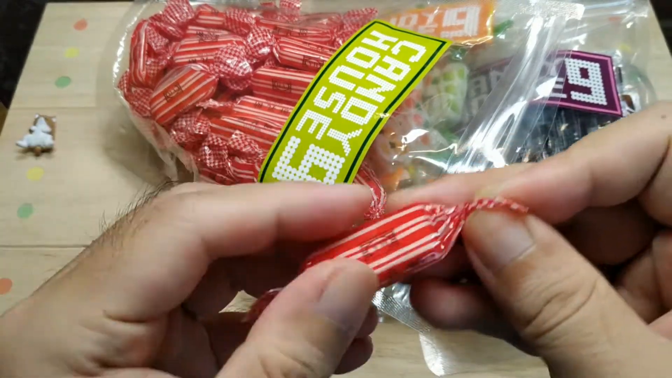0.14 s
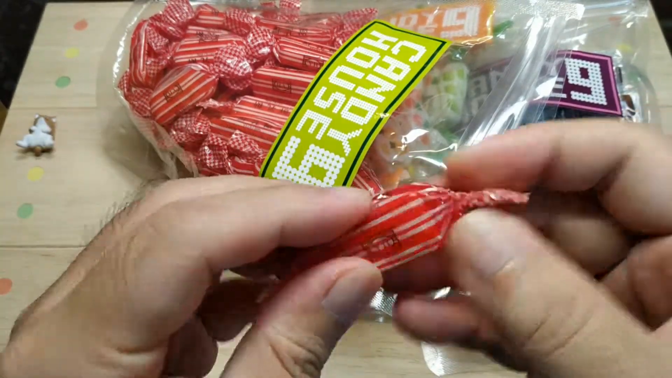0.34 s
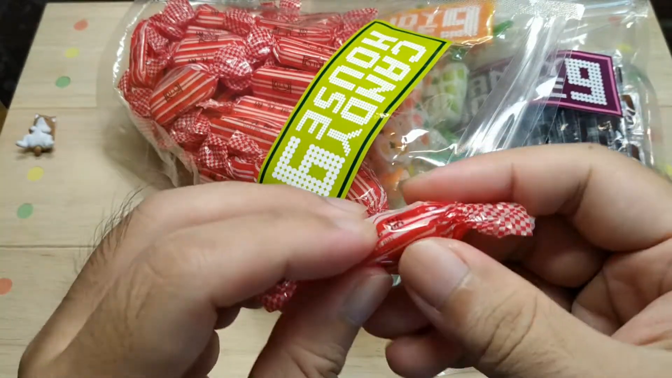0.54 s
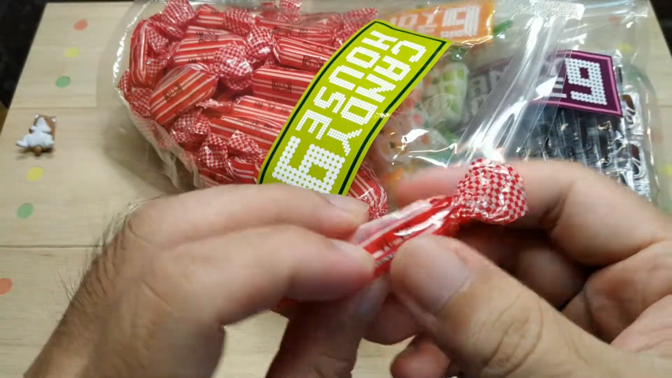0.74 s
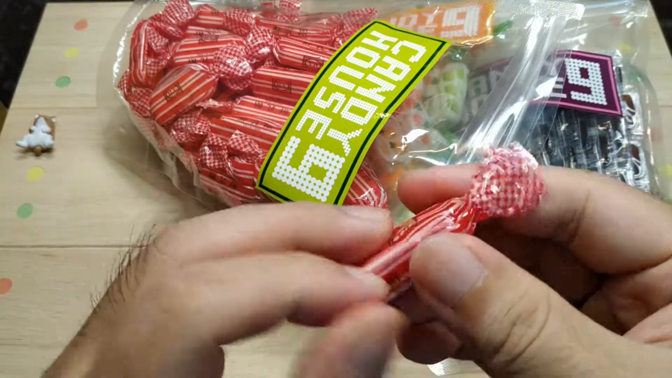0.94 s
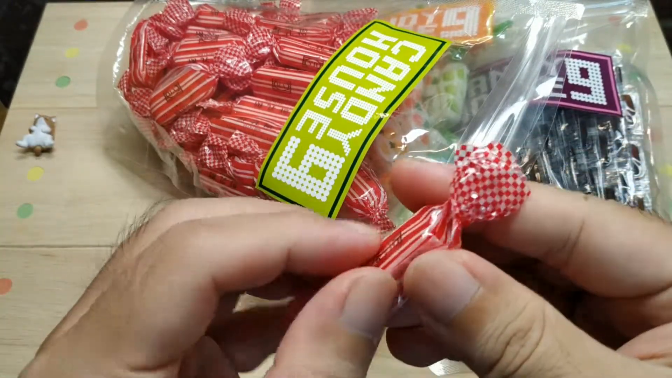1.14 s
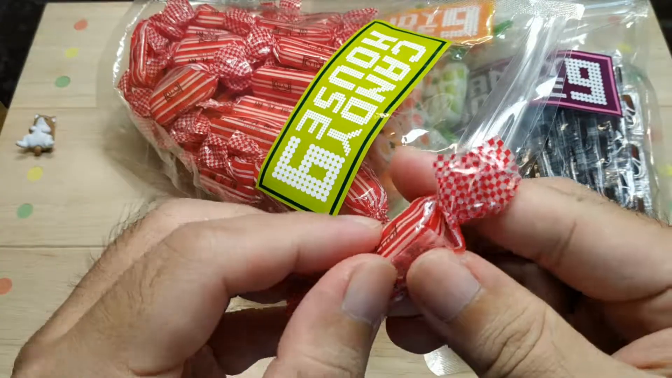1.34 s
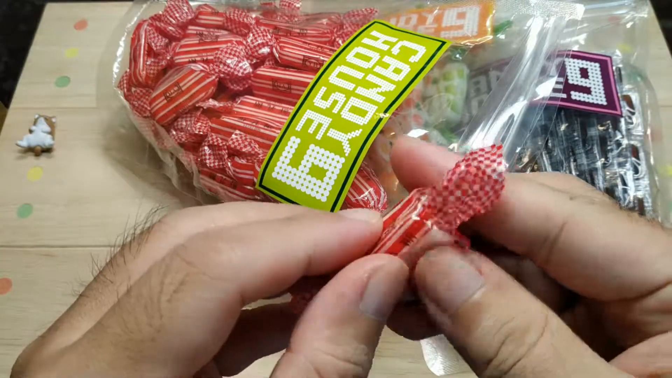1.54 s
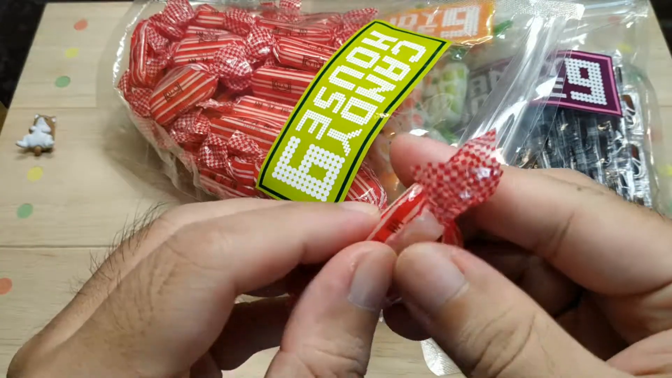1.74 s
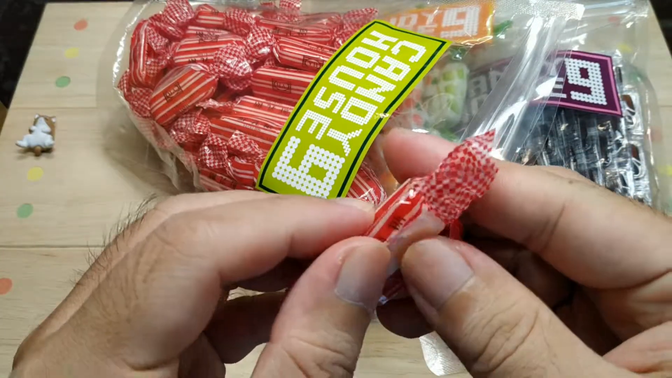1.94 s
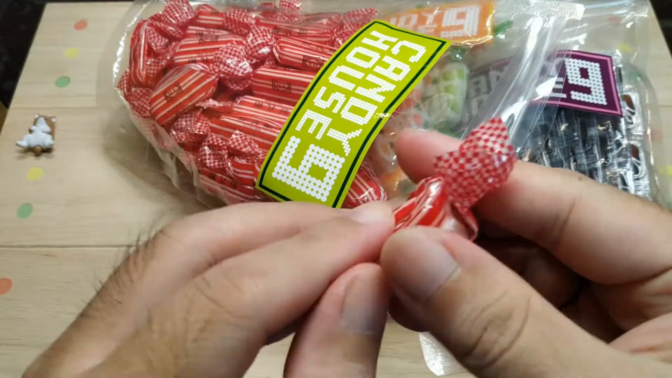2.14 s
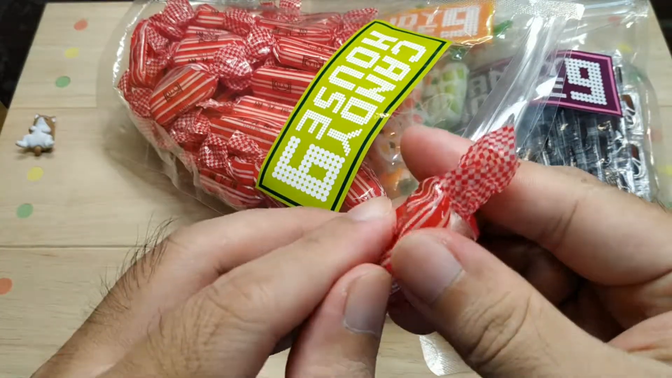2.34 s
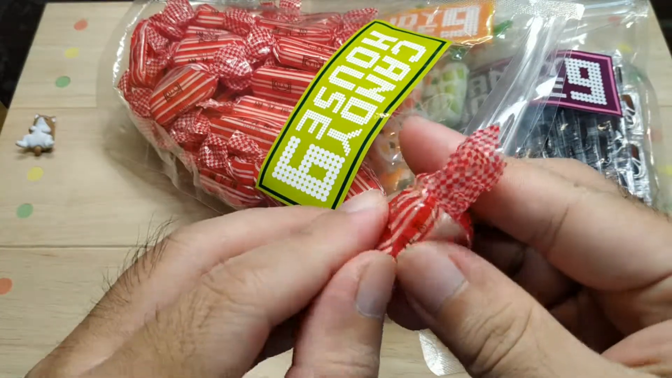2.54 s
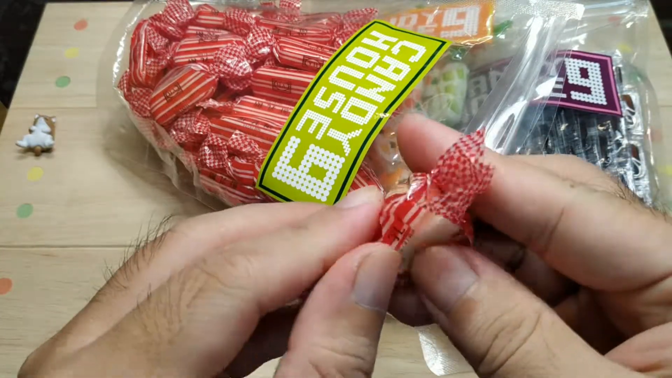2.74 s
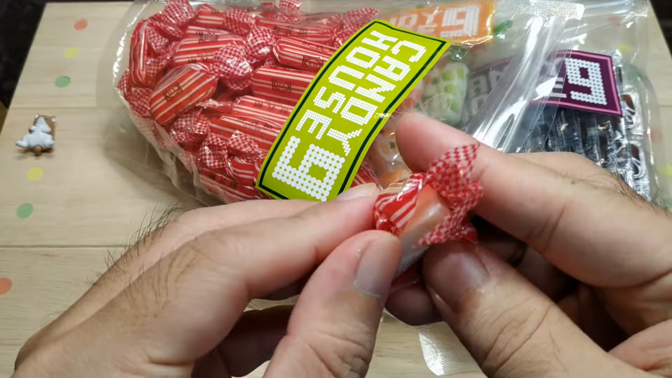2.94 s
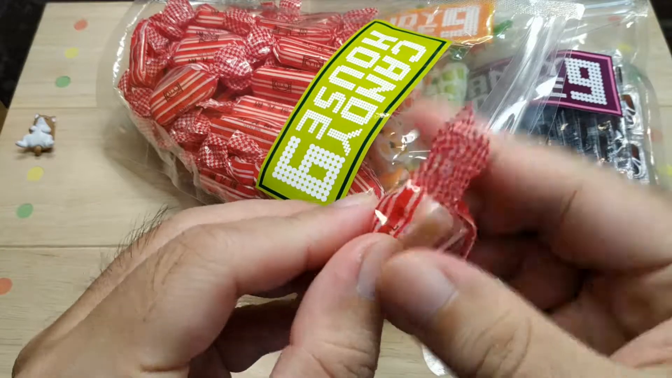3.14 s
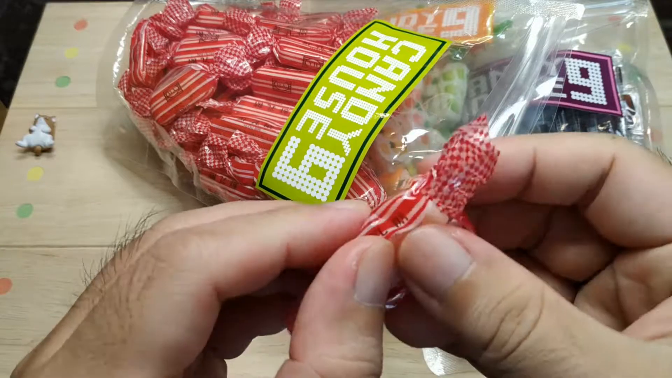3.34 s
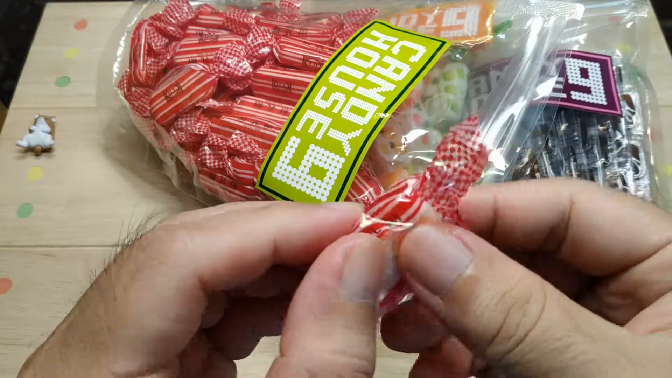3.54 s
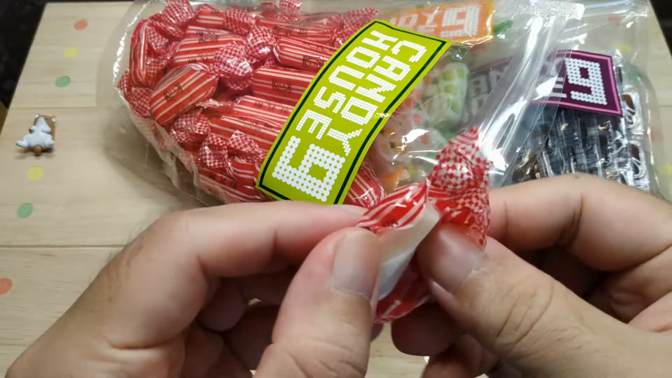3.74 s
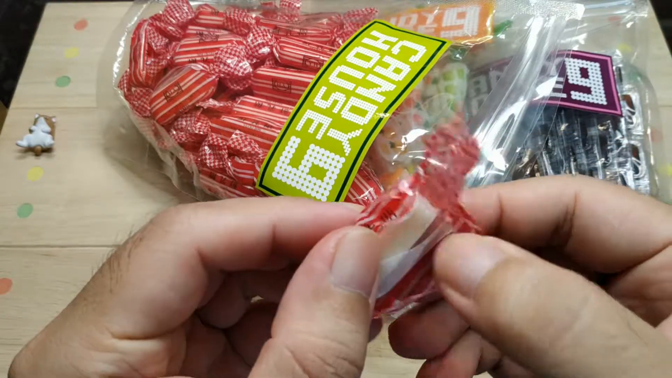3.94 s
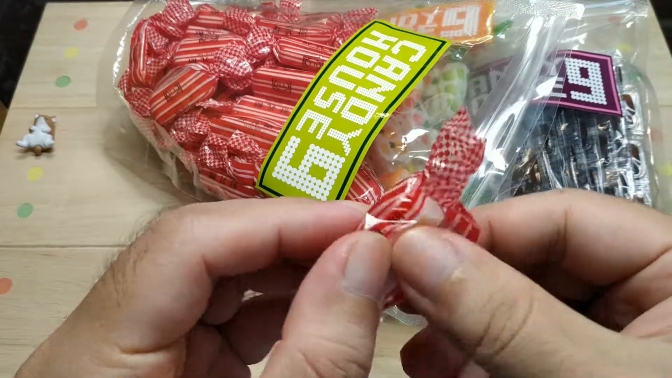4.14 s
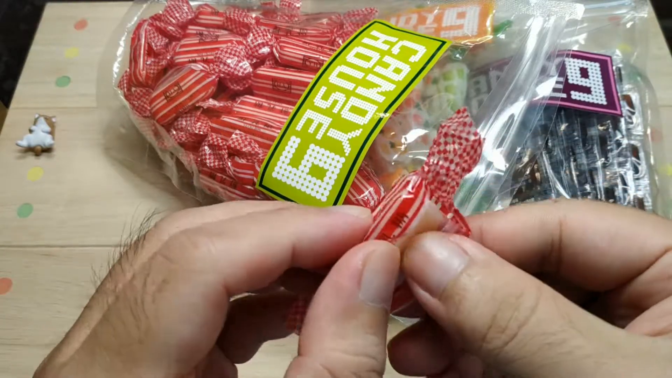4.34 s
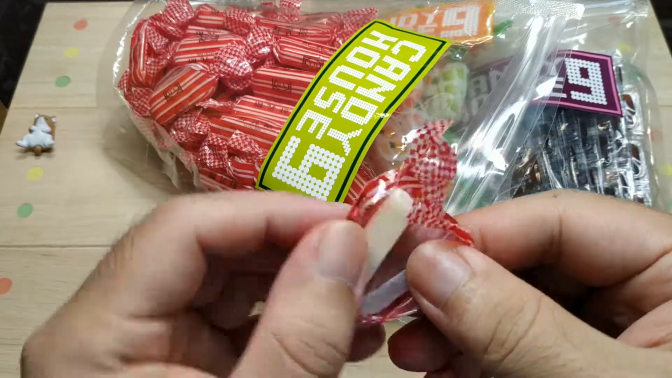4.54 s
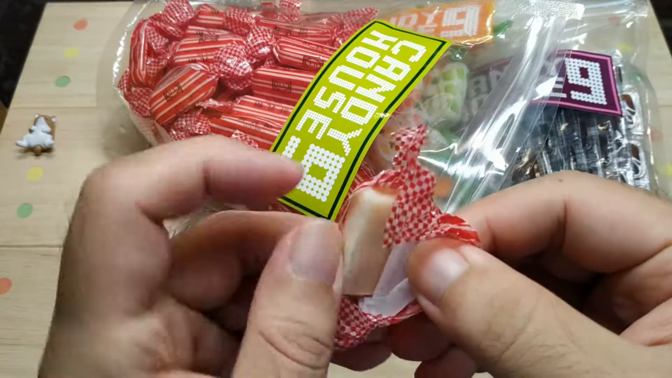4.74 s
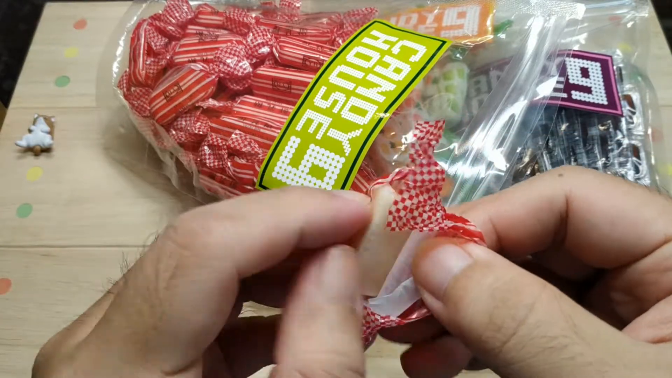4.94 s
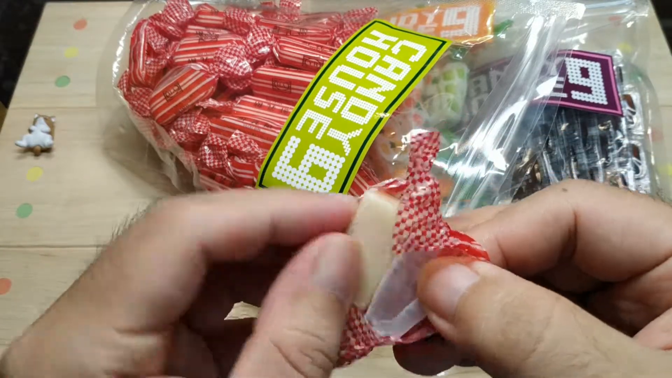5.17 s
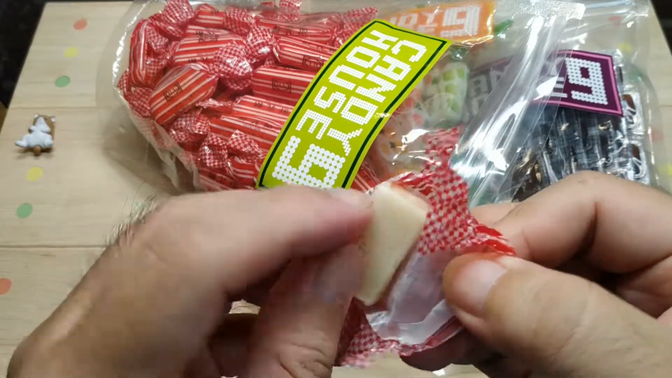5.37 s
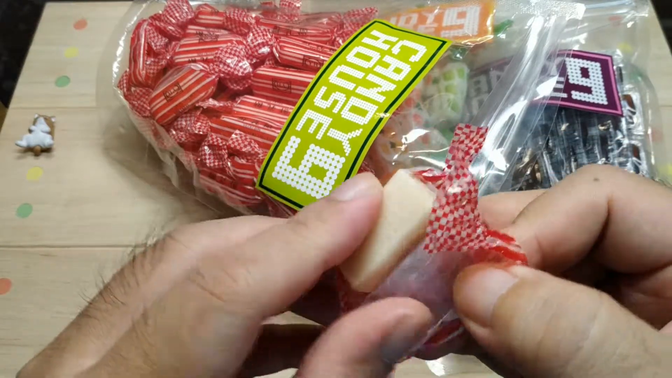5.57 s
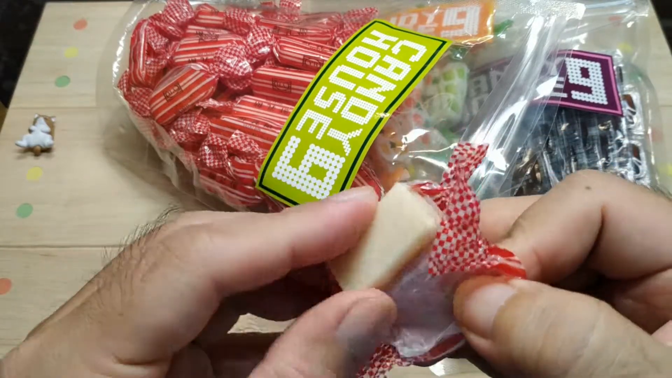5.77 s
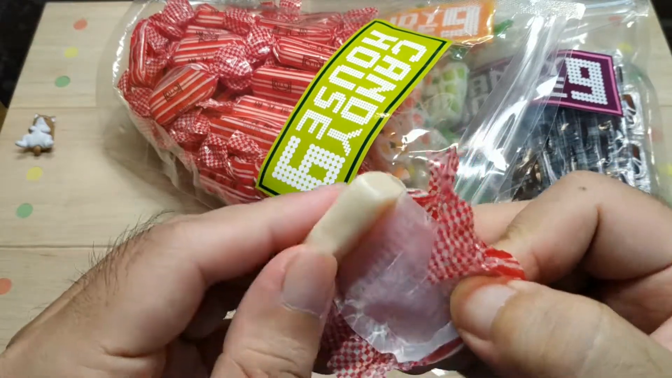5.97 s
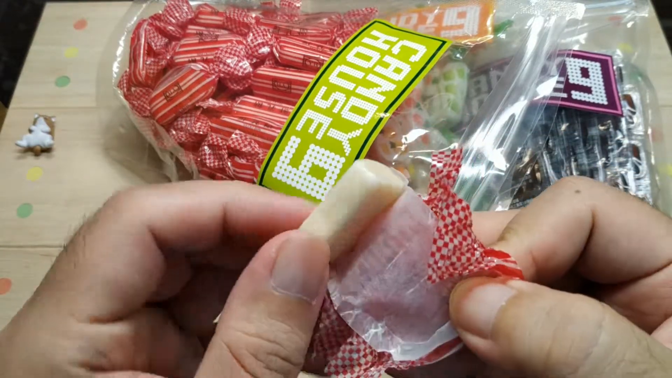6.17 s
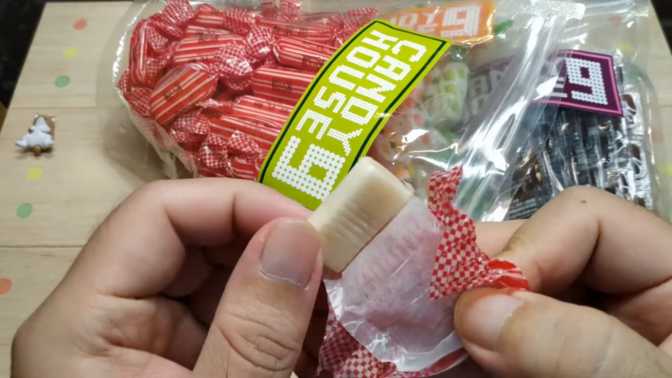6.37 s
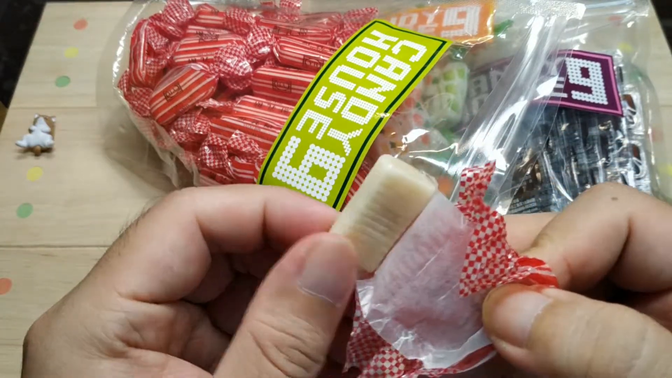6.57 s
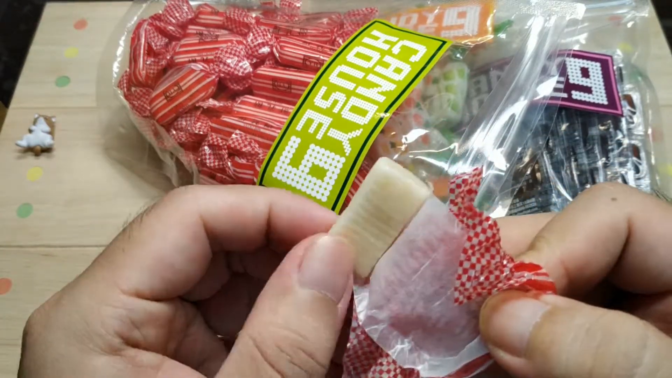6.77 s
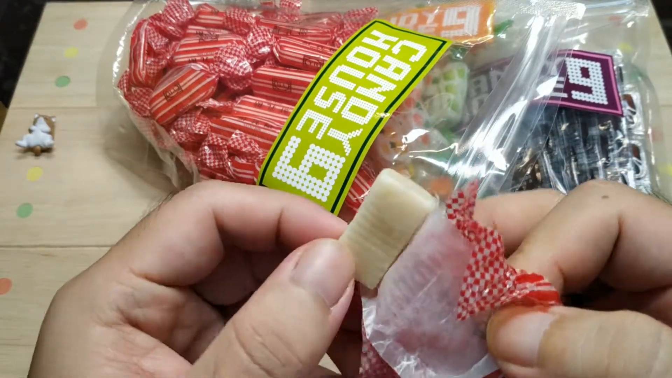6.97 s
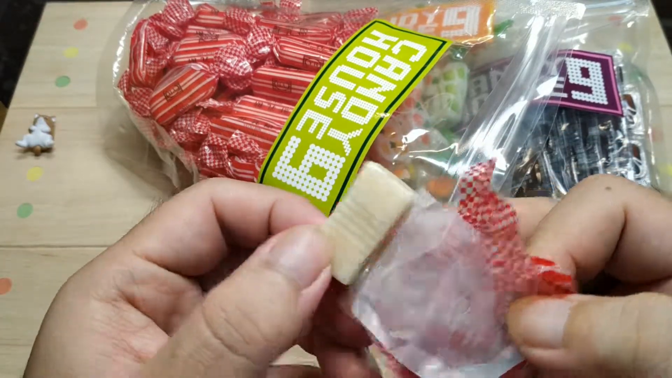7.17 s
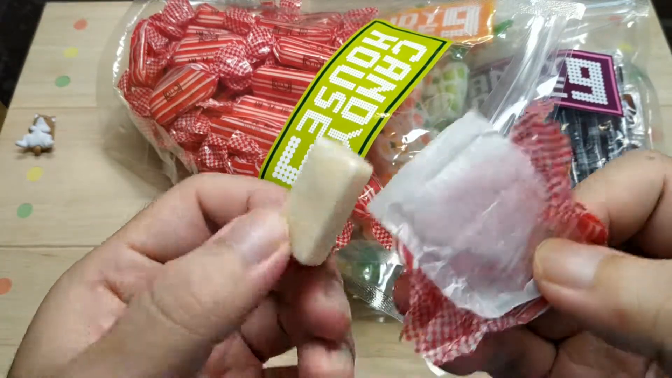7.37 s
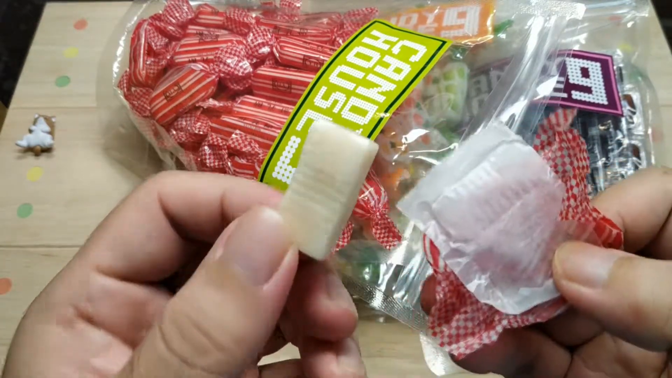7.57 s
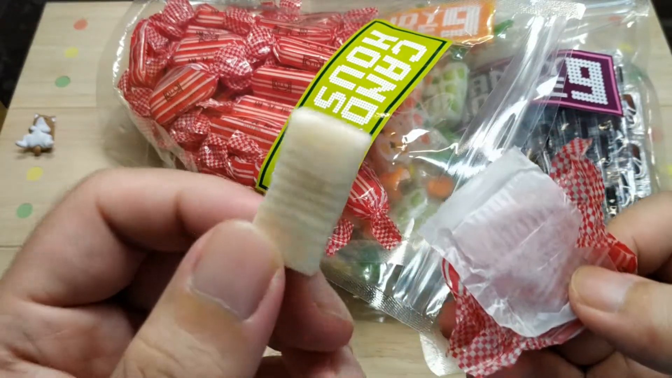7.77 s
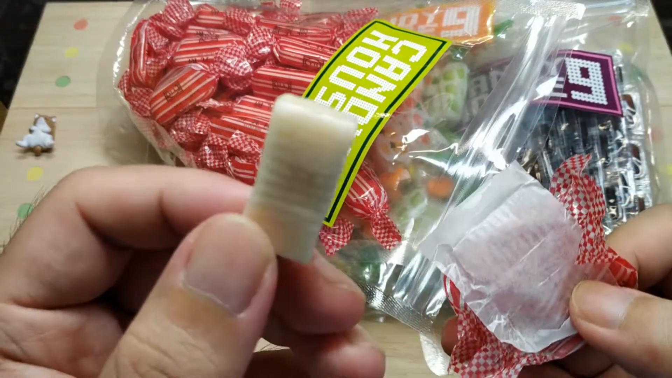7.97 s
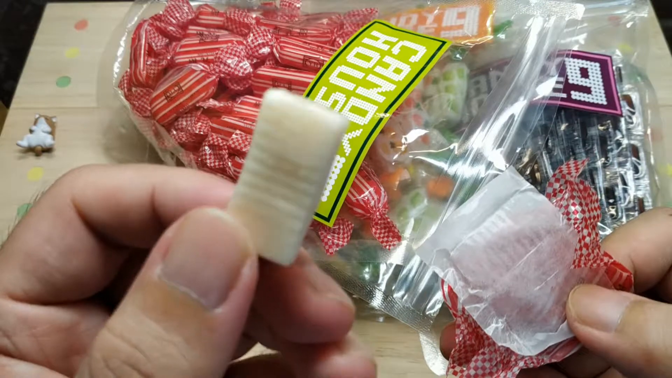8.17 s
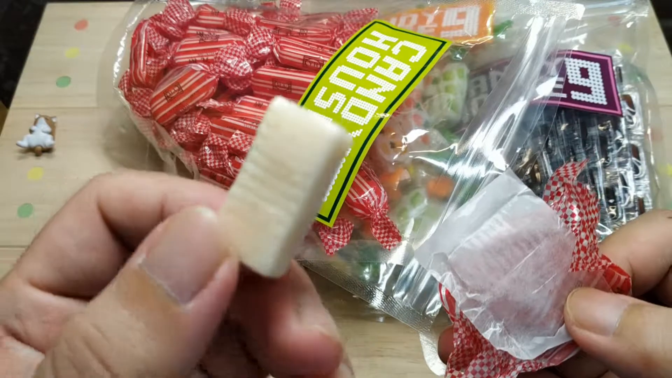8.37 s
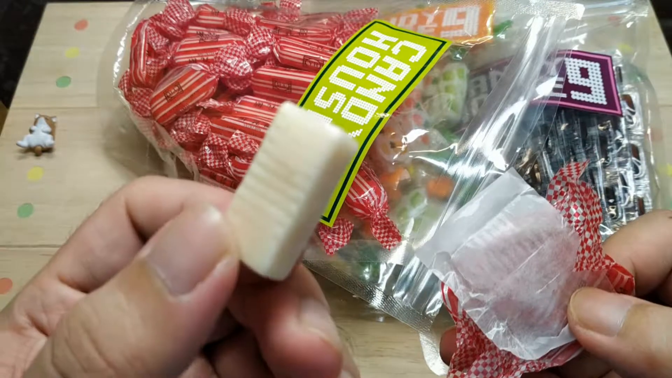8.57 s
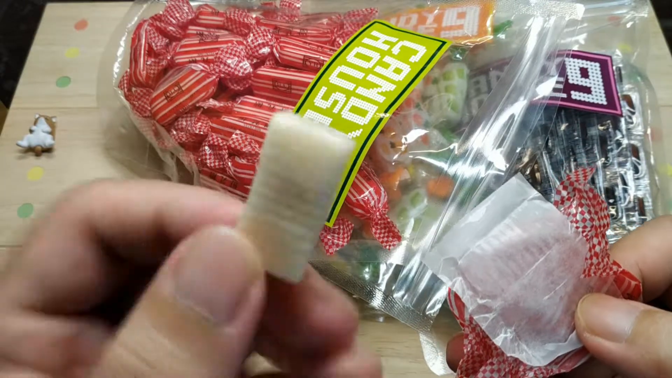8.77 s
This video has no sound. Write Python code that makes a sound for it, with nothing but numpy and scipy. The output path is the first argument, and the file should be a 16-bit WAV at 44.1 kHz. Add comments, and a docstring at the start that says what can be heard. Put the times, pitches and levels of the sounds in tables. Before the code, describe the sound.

Two close microphones catch a candy wrapper being opened at a table: rapid treble ticks, crackles and sharp pops, rarely pausing. Small dull knocks mark the sweet tugging free. Soft low puffs of air bump mainly the right side. The crackling peaks past the middle, eases, returns briefly, then stops, leaving quiet room hush, a low motor hum and a very faint distant engine note.

```python
"""At a table in a small room, fingers untwist and peel a stiff plastic wrapper off a sweet.
Creases in the film snap as runs of brief ringing cracks, over a bed of fine crackle; a few knocks
ring low modes. The table and the room answer with echoes and a short tail. A draught of shaped noise
and soft puffs buffet two close microphone ports, over a motor hum, a distant engine note and room hush."""
import sys
import numpy as np
from scipy import signal
from scipy.io import wavfile
from scipy.ndimage import uniform_filter1d

SR = 44100
rng = np.random.default_rng(int(sys.argv[2]) if len(sys.argv) > 2 else 0)


def store_pcm(level_fs):
    """Save levels as 16-bit WAV."""
    pcm = np.round(np.clip(level_fs, -1, 1) * 32767).astype(np.int16)
    wavfile.write(sys.argv[1], SR, np.atleast_2d(pcm).T)


def to_linear_factor(level_db):
    """Convert decibel levels (scalar or array-like) to linear amplitude factors."""
    exponent = np.asarray(level_db, float) / 20
    return 10 ** exponent


N = 388521  # length in samples

# Gusts on the ports. Each row: middle in seconds, length in seconds, right port in dB, left port in dB.
GUSTS = [(0.0, 0.15, -35, -62), (0.3, 0.56, -37.5, -47), (0.67, 0.2, -32, -48), (1.078, 0.18, -35.5, -40.5),
         (1.708, 0.33, -38, -54), (1.94, 0.049, -35, -52), (2.646, 0.65, -37, -65),
         (3.036, 0.076, -31.5, -42), (3.59, 0.19, -28, -63), (4.26, 0.39, -29.5, -55),
         (5.198, 0.18, -29.5, -42), (5.45, 0.035, -35, -48), (6.07, 0.68, -37.5, -53),
         (6.557, 0.54, -36.5, -51), (6.954, 0.15, -36.5, -44), (7.21, 0.19, -31, -47),
         (7.843, 0.2, -31, -49), (8.07, 0.28, -67, -45.5), (8.535, 0.057, -30.5, -48.5),
         (8.8, 1, -34.5, -63)]
# Draught level between gusts: left port in dB, right port in dB.
LULL_DB = [-52, -54]
# Tone of the draught. Each row: frequency in Hz, relative level in dB per Hz.
DRAUGHT_TONE = [(4.7, -10), (8.0, -19), (27, 8), (56, -3), (115, -15), (300, -42.5), (390, -88),
                (660, -120)]
# Tone of the room hush. Each row: frequency in Hz, relative level in dB per Hz.
HUSH_TONE = [(20, 4.5), (50, 6.5), (100, -8.5), (200, -11.5), (340, -12.5), (480, -14), (780, -14.5),
             (1400, -18.5), (1750, -17), (2000, -20), (5000, -27), (9000, -31.5), (15500, -37),
             (16200, -45) ]
# How alike the hush is at the two ports. Each row: frequency in Hz, likeness (1 is identical).
HUSH_LIKENESS = [(60, 0.11), (150, 1), (300, 0.62), (640, 0.21), (1500, -0.24), (4970, -0.13), (15000, 1)]
# Balance of the hush. Each row: frequency in Hz, left level over right in dB.
HUSH_BALANCE = [(60, -1), (380, -2.5), (2380, 0), (15000, -2.5)]
# Fingers squeezing the film. Each row: firmest grip in seconds, crackle level in dB, length in seconds.
SQUEEZES = [(0.071, -30, 0.091), (0.387, -27.5, 0.045), (0.572, -34.5, 0.29), (0.828, -44, 0.1),
            (1.015, -35, 0.14), (1.222, -54, 0.21), (1.366, -48, 0.99), (1.6, -25.5, 0.017),
            (1.716, -27.5, 0.034), (1.819, -36, 0.18), (2.188, -28, 0.056), (2.354, -35.5, 0.054),
            (2.445, -38.5, 0.094), (2.698, -36, 0.11), (2.924, -28, 0.046), (3.135, -39, 0.091),
            (3.341, -34, 0.12), (3.495, -43.5, 0.15), (3.687, -34, 0.027), (3.774, -32, 0.12),
            (4.02, -36.5, 0.18), (4.367, -29.5, 0.079), (4.587, -55, 0.16), (4.705, -32.5, 0.17),
            (4.852, -33, 0.15), (5.017, -29.5, 0.062), (5.216, -47, 0.065), (5.306, -35.5, 0.4),
            (5.526, -22.5, 0.027), (5.61, -21, 0.046), (5.703, -35, 0.24), (6.006, -20.5, 0.04),
            (6.137, -33.5, 0.14), (6.437, -38, 0.083), (6.647, -48, 0.067), (6.857, -45.5, 0.11),
            (7.073, -25, 0.04), (7.228, -43.5, 0.23), (7.317, -25, 0.01), (7.458, -32.5, 0.028)]
# The sheet opens and its larger panels speak.
# Each row: time in seconds, low body in dB over the crackle when the crackle is at -40 dB.
OPENING = [(0, -53), (1.2, -46), (2.4, -32), (3.1, -42), (3.5, -19), (4.3, -25), (4.8, -19), (6.2, -24),
           (7.3, -14), (7.6, -8)]
# Creases that buckle. Each row: main crack in seconds, treble peak in dB, loudest ring in Hz,
# peak of the low body in dB over the treble peak.
SNAPS = [(0.0138, -11.5, 14300, -41), (0.0515, -10.5, 7300, -35), (0.0572, -9, 9100, -45),
         (0.0683, -28, 10100.0, -41.0), (0.08, -6.5, 7000.0, -39), (0.086, -20, 9900.0, -38),
         (0.0955, -15, 6240, -38), (0.1047, -25, 14400.0, -32), (0.119, -15.0, 10100, -45.0),
         (0.2609, -11.5, 12700, -39.0), (0.2964, -11, 6540, -34.0), (0.3217, -16, 10600, -45.0),
         (0.3445, -17, 4800.0, -28.5), (0.3482, -17.5, 9000.0, -35), (0.3665, -31, 14700.0, -34),
         (0.3738, -19, 4100.0, -37), (0.3764, -25, 8800.0, -17), (0.3906, -17.0, 8900.0, -36),
         (0.4121, -7.5, 5900, -37), (0.4187, -8, 12900.0, -42), (0.4232, -10, 12800.0, -31),
         (0.4274, -7.5, 12700.0, -28), (0.4471, -9.5, 7840, -31), (0.4539, -11.5, 9900.0, -28),
         (0.458, -14.5, 3620, -33), (0.4715, -10.5, 7600.0, -47), (0.5016, -13, 11600.0, -40),
         (0.519, -15, 10500.0, -36.0), (0.5263, -15.5, 10800.0, -32), (0.5506, -7, 8150, -22.5),
         (0.5737, -8.5, 7660, -34), (0.5793, -10.5, 9000.0, -26), (0.5846, -10.5, 10000.0, -36),
         (0.6451, -10.5, 11500.0, -25), (0.6747, -6.5, 12300, -31.0), (0.7564, -22, 15200.0, -45.0),
         (0.7955, -19, 5370, -36), (0.8119, -24, 10800.0, -31), (0.8163, -5.5, 9400, -30.0),
         (0.8434, -13.5, 9100, -48), (0.868, -16.5, 5070, -32), (0.9338, -25, 12700, -35.0),
         (0.9468, -22, 10200, -26), (0.9692, -17, 4900.0, -21), (0.9964, -18.0, 7900.0, -21),
         (0.999, -12.5, 8100, -29), (1.0062, -26, 11200.0, -27), (1.0197, -18, 9900.0, -28),
         (1.0235, -6, 7700, -23), (1.046, -21, 11900.0, -33), (1.074, -12.5, 12500, -38),
         (1.0975, -19.0, 11700.0, -23), (1.1095, -9.5, 9700, -33), (1.1383, -15.5, 13600.0, -32.0),
         (1.174, -16.5, 12400.0, -25), (1.1875, -13, 14900.0, -34), (1.1918, -12.5, 11600, -24),
         (1.2385, -23, 4100.0, -23), (1.2437, -14.5, 4000, -36), (1.2475, -14.5, 12100.0, -27),
         (1.2722, -17.5, 8850, -45.0), (1.308, -22.5, 13600, -28), (1.3226, -18, 8300.0, -45.0),
         (1.331, -10.5, 11100, -49), (1.3613, -17, 8100, -32), (1.3873, -22, 15100, -47),
         (1.3962, -15.0, 11200, -43), (1.4088, -23, 12000.0, -35), (1.437, -22, 14100.0, -45.0),
         (1.4588, -23, 8150, -45.0), (1.4677, -21.0, 9800.0, -38), (1.4821, -14.5, 15000.0, -44),
         (1.5114, -17.5, 9900, -26), (1.5403, -21, 4330, -21), (1.5472, -18, 8900.0, -38.0),
         (1.5589, -27, 14800.0, -43.0), (1.5853, -11, 12900.0, -30), (1.5916, -23, 14600.0, -26),
         (1.5993, -15, 13400.0, -34), (1.6187, -8, 12600, -50), (1.6512, -8, 10900, -31.0),
         (1.6592, -11.5, 13300.0, -34), (1.6852, -9.5, 6600.0, -25), (1.7073, -6, 8750, -31),
         (1.7144, -12, 8700, -32), (1.7247, -24, 10000.0, -16), (1.7531, -19.5, 9200.0, -38),
         (1.7817, -23, 11700, -35), (1.8136, -17, 14900.0, -26), (1.8256, -8.5, 11400, -34),
         (1.8657, -19.0, 8050, -20), (1.8938, -6.5, 6900, -52), (1.9596, -10, 9400, -25),
         (2.004, -10, 9440, -46), (2.0508, -13, 13700, -53), (2.173, -19, 6400.0, -22),
         (2.1842, -9.5, 9200.0, -27), (2.293, -26, 4100.0, -23), (2.332, -8, 9300.0, -39),
         (2.3433, -15, 8900, -12), (2.3652, -23.0, 10700.0, -16), (2.4195, -21, 5050, -32),
         (2.4562, -24, 9300, -36), (2.4656, -20, 13500, -25), (2.4731, -12, 6500, -19.5),
         (2.4944, -12.5, 11700, -48), (2.565, -24, 6500.0, -43), (2.5999, -17, 9500.0, -35),
         (2.6042, -9, 10600, -37.0), (2.6645, -10, 11400, -47), (2.684, -9, 9250, -30),
         (2.6994, -22, 12200.0, -23), (2.7225, -24, 8900.0, -19), (2.749, -12.5, 13400.0, -45.0),
         (2.7775, -11.5, 12300.0, -47), (2.8019, -14.5, 7300.0, -43.0), (2.8507, -12.5, 7600, -21.5),
         (2.857, -12, 10400, -28.0), (2.8944, -1, 5960, -35), (2.9094, -15, 3400.0, -37),
         (2.9227, -8, 3400.0, -28), (2.9385, -12, 10600.0, -37), (2.9695, -15, 12100.0, -47),
         (2.9882, -17, 7500, -42.0), (3.035, -12.5, 13000, -33), (3.0907, -16.5, 11700, -36),
         (3.1085, -9, 12600, -55), (3.155, -22.5, 6740, -23), (3.2499, -5.5, 10800.0, -44),
         (3.2616, -13, 8900, -28), (3.2766, -18.5, 9600.0, -25.0), (3.2877, -19.5, 3800.0, -12),
         (3.2954, -16, 9300, -37), (3.2993, -4.5, 12000.0, -26.5), (3.3094, -6, 12300, -47),
         (3.3238, -20, 10500.0, -44.0), (3.3381, -11, 9500.0, -40), (3.3613, -14.5, 11000.0, -24),
         (3.3689, -16, 11300, -36.0), (3.4359, -14.5, 9200.0, -14.5), (3.486, -6.0, 13400, -27.0),
         (3.4928, -19, 11700, -25), (3.5034, -11, 10200.0, -37), (3.5188, -15, 9050, -22),
         (3.649, -5.5, 8800, -19.5), (3.689, -24, 9400.0, -13), (3.707, -24, 9000.0, -33.0),
         (3.7191, -9.5, 13600, -32), (3.722, -32, 8500.0, -45), (3.7523, -13, 12500, -37.0),
         (3.769, -11, 8500.0, -41), (3.7777, -9, 6560, -37), (3.7808, -12.5, 9800.0, -21),
         (3.789, -22, 8800.0, -13), (3.828, -11, 9200, -26), (3.8415, -15, 14200.0, -16.0),
         (3.8716, -17, 8600.0, -16), (3.916, -17.5, 14200.0, -29.0), (3.9413, -24, 13100.0, -15),
         (3.9652, -8.0, 6200.0, -21.5), (3.987, -15, 9500.0, -16), (3.993, -15, 3400.0, -23),
         (4.0083, -8, 9800, -43.0), (4.0447, -5.5, 3420, -35), (4.0523, -3, 7980, -30),
         (4.0933, -12, 7700.0, -24), (4.1381, -12.0, 11100.0, -20.5), (4.1416, -10, 13400.0, -31),
         (4.178, -8, 11000, -27.5), (4.2553, -14.5, 11000.0, -20), (4.259, -9.5, 8700, -27),
         (4.311, -8.5, 10100, -19), (4.3437, -13.5, 4500.0, -24), (4.375, -13.0, 10800, -19),
         (4.382, -12, 11300, -22), (4.394, -20, 11600.0, -32), (4.4, -8, 12500.0, -42.0),
         (4.4154, -11.5, 7600, -25.5), (4.4592, -18.5, 7140, -34.0), (4.485, -16, 10200, -20),
         (4.504, -18, 14500.0, -30.0), (4.5085, -20.5, 3400.0, -13), (4.531, -9, 11100, -23),
         (4.5624, -24, 11760, -20), (4.5848, -13, 8350, -29), (4.6335, -19, 10450, -20.0),
         (4.6383, -9.5, 8700, -48), (4.6523, -20, 4640, -12.5), (4.6796, -15, 13900.0, -20),
         (4.6859, -5.5, 9200.0, -23), (4.6983, -16.0, 12300.0, -21), (4.708, -11.5, 9800.0, -34),
         (4.7359, -17.0, 8400.0, -16), (4.7417, -17, 8350, -17), (4.7807, -14.5, 11000, -29.0),
         (4.7942, -9.5, 8700, -30), (4.819, -11.5, 11500.0, -42), (4.824, -13, 10300.0, -26),
         (4.843, -34, 15200.0, -24), (4.8603, -16, 11300, -34), (4.869, -13.5, 11700, -21.5),
         (4.937, -23.5, 11500.0, -20.0), (4.9954, -19.5, 10400.0, -14.5), (5.0046, -16, 10200.0, -20.0),
         (5.027, -17, 3600.0, -19), (5.0491, -21, 10100.0, -18), (5.07, -5, 8700, -30),
         (5.1147, -13, 13300.0, -43.0), (5.1461, -12, 8900, -39), (5.161, -13, 15000, -48),
         (5.211, -38, 11400.0, -38), (5.2235, -11, 11500.0, -28), (5.2356, -10, 12500.0, -36),
         (5.25, -14, 3440, -25), (5.2741, -18, 10200.0, -27), (5.2797, -6, 14100.0, -24),
         (5.2926, -11, 10100.0, -25), (5.3031, -2.5, 11500, -27.5), (5.332, -18, 4600.0, -34),
         (5.339, -15, 14800.0, -28), (5.3642, -15, 11300, -27.0), (5.438, -14, 12000, -22),
         (5.4426, -11.5, 5440, -27.5), (5.4646, -25, 8300.0, -24), (5.4797, -13.5, 3360, -18),
         (5.5035, -11, 3400.0, -16.5), (5.5192, -9, 7450, -20), (5.5318, -15.0, 14300, -20),
         (5.572, -17, 11400.0, -12), (5.5797, -3.5, 13900.0, -26.5), (5.5905, -12, 10700, -20),
         (5.611, -14, 7900.0, -18), (5.6175, -10.5, 11500.0, -18), (5.6262, -12, 11300, -31),
         (5.6661, -7.5, 12200, -27), (5.682, -19, 12600, -45.0), (5.7034, -13.5, 7400.0, -19),
         (5.7325, -10.5, 9350, -25), (5.7433, -17, 9060, -29), (5.7481, -14.0, 10300, -35),
         (5.8113, -22, 14500.0, -24), (5.8391, -9.5, 6800, -35), (5.8943, -15, 8800, -18.0),
         (5.9175, -14, 7000.0, -27.5), (5.9402, -15, 12800.0, -44), (5.972, -16, 8700.0, -21),
         (5.9894, -16.5, 9800.0, -14), (5.9974, -6, 3520, -23), (6.0166, -11, 10000.0, -20),
         (6.0328, -14.0, 9100.0, -23), (6.0435, -14.0, 12500.0, -37.0), (6.109, -16.5, 6800.0, -17.0),
         (6.1186, -12, 10100.0, -22), (6.1326, -20, 13100.0, -27.0), (6.153, -14, 10700.0, -24),
         (6.1659, -20, 11400.0, -27.0), (6.2062, -6.5, 6000, -28.5), (6.3392, -24.0, 4000.0, -16),
         (6.3587, -9, 7600, -40), (6.377, -16, 10800.0, -17), (6.4061, -5.5, 13200, -26),
         (6.512, -33.5, 7800, -10.5), (6.5456, -28.5, 15300, -21), (6.616, -36.5, 9000, -15),
         (6.68, -32, 11000, -25), (6.708, -25, 7400, -10), (6.7502, -26.5, 8900, -21),
         (6.828, -31, 9000, -24), (6.8593, -10, 9500, -50), (6.8995, -20, 9500.0, -23),
         (6.9576, -27, 14300.0, -29), (6.9983, -7.5, 8500.0, -47), (7.0136, -8.5, 14700, -41),
         (7.028, -22, 11300.0, -26), (7.0444, -13.5, 8050, -33), (7.0536, -16, 9750, -18),
         (7.0667, -18.5, 9700, -17.5), (7.077, -7.5, 6340, -25.5), (7.097, -17.0, 11400.0, -22),
         (7.1021, -11, 7000.0, -20), (7.134, -9.5, 10200, -32), (7.141, -20, 11800, -39.0),
         (7.1709, -16.5, 9600.0, -36), (7.2149, -15.5, 7500.0, -36.0), (7.2325, -25.0, 6900.0, -28),
         (7.2459, -14, 3400.0, -33), (7.2859, -20, 10200, -44.0), (7.3035, -15, 3920, -14),
         (7.3144, -24, 12700.0, -34), (7.3188, -15, 9700, -31), (7.3247, -19.5, 3500.0, -24),
         (7.3761, -31, 12800.0, -32.0), (7.3846, -16.5, 10100, -29), (7.4486, -18.5, 4000.0, -19),
         (7.48, -16, 6300, -23), (7.8213, -22.5, 9200, -29.0), (8.0558, -38.5, 4000, -10)]
# Ring of the film. Each row: frequency in Hz, relative level in dB.
FILM_RING = [(1710, -11), (2900, -5.5), (3770, 1), (4100, 3), (5440, 2.5), (6000, 7), (11500, 13),
             (15400, 13.5), (17500, -13)]
# Ring of its larger panels. Each row: frequency in Hz, relative level in dB.
PANEL_RING = [(300, -32), (780, 2), (1300, 1.5), (1700, 9), (2100, 6.5), (3000, 9)]
# Short puffs of air on the right port. Each row: start in seconds, level in dB.
PUFFS = [(0.025, -27), (0.624, -34.5), (1.018, -33), (1.088, -31), (1.581, -35.5), (2.37, -31.5),
         (2.85, -31.5), (3.583, -36), (4.014, -29), (4.16, -28), (4.328, -27), (4.411, -26), (4.654, -29.5),
         (5.09, -33), (5.341, -32), (5.45, -32.5), (5.643, -31.5), (5.977, -25), (6.066, -33),
         (6.46, -27.5), (6.54, -31.5), (7.2, -41), (7.4, -32), (8.477, -31.5)]
# A distant engine note that sags. Each row: time in seconds, pitch in Hz, RMS level in dB.
ENGINE = [(3.4, 180.6, -76), (3.8, 183, -62), (4.7, 176.7, -60.5), (5.5, 182, -76), (7.4, 167.6, -66),
          (7.999, 163.2, -65.5), (8.81, 165, -61.5)]
# The sweet tugs free of the film. Each row: start in seconds, peak in dB.
KNOCKS = [(4.738, -39), (4.865, -34), (6.404, -27.5), (7.076, -32), (7.318, -34), (7.477, -37)]
# Modes of a knock. Each row: middling pitch in Hz, relative level in dB, time to fall 60 dB in seconds.
KNOCK_MODES = [(353, 6, 0.018), (504, 0, 0.018), (746, 4.5, 0.018), (1050, 0, 0.014)]
# Echoes from hands and table. Each row: middling delay in ms, level in dB.
ECHOES = [(2.3, -17), (4.7, -16)]
# How fast the room tail dies. Each row: frequency in Hz, time to fall 60 dB in seconds.
ROOM_T60 = [(1000, 0.29), (4000, 0.21), (9000, 0.21), (15600, 0.12)]
# Upper edge of the sound: flat to about 15.6 kHz, a faint shelf, silent above 16.7 kHz.
# Each row: frequency in Hz, gain in dB.
TOP_EDGE = [(0, 0), (15650, 0), (15850, -9), (16450, -12), (16700, -80), (SR / 2, -80)]

LEAD = 160  # samples from the start of a run of cracks to the main crack
LEFT_LAG = 4  # samples by which the left port hears the wrapper later


def evened(x):
    """Scales a signal to an RMS of 1."""
    return x / np.sqrt(np.mean(x ** 2) + 1e-20)


def read(points, hz):
    """Reads a table's curve at any frequency, along a log frequency scale."""
    f, value = np.transpose(points)
    return np.interp(np.log(hz + 1), np.log(f + 1), value)


def sides(pan_db):
    """Left and right gains that keep the total power."""
    left = to_linear_factor(np.asarray(pan_db))
    return np.array([left, np.ones_like(left)]) * np.sqrt(2 / (1 + left ** 2))


def swells(t, s, db, rise_s, fall_s, fade_db):
    """Level in dB of humps that add in power, each climbing to db at s and fading away again."""
    late = t[:, None] - s
    hump_db = db - fade_db * np.maximum(late / fall_s, -late / rise_s)
    return 10 * np.log10((to_linear_factor(hump_db) ** 2).sum(1) + 1e-12)


def noise(field_db, size, same=None):
    """Two channels of random short-time spectra shaped by field_db(hz, t)."""
    frames, hz = 4 * N // size + 5, np.fft.rfftfreq(size, 1 / SR)
    a, b, c, d = rng.standard_normal((frames, len(hz), 4)).T
    first, other = a + 1j * b, c + 1j * d
    alike = np.clip(same(hz) if same else 0 * hz, -1, 1)[:, None]
    z = np.array([first, alike * first + np.sqrt(1 - alike ** 2) * other])
    z *= to_linear_factor(field_db(hz[:, None], np.arange(frames) * size / 4 / SR))
    return signal.istft(z, nperseg=size, noverlap=3 * size // 4)[1][:, :N]


def draught():
    """Lumpy low turbulence, unrelated at the two ports; strong gusts reach higher."""
    s, length, right_db, left_db = np.transpose(GUSTS)
    fade_db = 12.5  # fall over one length to either side

    def ports_db(t):
        gusts = [swells(t, s, db, length, length, fade_db) for db in (left_db, right_db)]
        power = to_linear_factor(np.array(gusts)) ** 2 + to_linear_factor(np.array(LULL_DB))[:, None] ** 2
        return 10 * np.log10(power)
    course_db = ports_db(np.arange(0, N / SR, .01))

    def field_db(hz, t):
        lumps = evened(uniform_filter1d(rng.standard_normal((len(t), 2)), 3, 0)).T[:, None]
        reach = 1 + 0.19 * np.clip(np.log2((hz + 1) / 70), 0, 2)  # level swings grow above 70 Hz
        swing_db = ports_db(t)[:, None] - course_db.mean() + 2.86 * lumps
        return read(DRAUGHT_TONE, hz) + swing_db * reach
    return evened(noise(field_db, size=2048)) * np.sqrt(np.mean(to_linear_factor(course_db) ** 2))


def hush():
    """Steady noise shaped like the air noise of the room and the hiss of the microphone."""
    rms_db = -51

    def field_db(hz, t):
        balance_db = 20 * np.log10(sides(read(HUSH_BALANCE, hz)))
        return (read(HUSH_TONE, hz) + balance_db) * np.ones(len(t))
    return to_linear_factor(rms_db) * evened(noise(field_db, size=2048, same=lambda hz: read(HUSH_LIKENESS, hz)))


def motor_hum():
    """A motor tone of fixed pitch whose level wavers slowly, alike at both ports."""
    hum_hz, rms_db, waver_db = 119, -59, 1.5
    t = np.arange(N) / SR
    waver = evened(uniform_filter1d(uniform_filter1d(rng.standard_normal(N), 6000), 6000))
    sine = np.sqrt(2) * np.sin(2 * np.pi * hum_hz * t)  # RMS 1
    return to_linear_factor(rms_db + waver_db * waver) * sine


def rings(hz, db, t60, unlike=0.88):
    """Sums of dying modes, one sum a row, peak 1; each port hears every mode from another angle."""
    t = np.arange(420) / SR
    start, turn, lobe = rng.standard_normal((len(hz), 3, hz.shape[1], 2)).transpose(1, 3, 0, 2)
    offset = 0.7 * start[0] + unlike * turn  # radians: the modes set off nearly together
    phase = 2 * np.pi * hz[..., None] * t + offset[..., None]
    decay = to_linear_factor(db[..., None] - 60 * t / t60[..., None])
    onset = (1 - np.exp(-t / (0.07 * t60[..., None]))) ** 2
    out = (to_linear_factor(2.13 * lobe)[..., None] * np.sin(phase) * decay * onset).sum(2)
    return out / abs(out).max(2, keepdims=True).mean(0)


def buckles(ring_hz, run_t60_ms):
    """A crease gives way in a quick run of cracks; each excites brief treble modes and the low panels."""
    place = rng.random((len(ring_hz), 2, 20))
    hz = 2500 + 14500 * ((np.arange(20) + place[:, 0]) / 20) ** 1.25  # closer in the low treble
    db = read(FILM_RING, hz) + 6.8 * np.exp(-((hz - ring_hz[:, None]) / 1700) ** 2)
    treble = rings(hz, db, .0022 * (8000 / hz) ** .75)  # dies in 2.2 ms at 8 kHz
    low_hz = 300 + 2600 * (np.arange(7) + place[:, 1, :7]) / 7
    low = rings(low_hz, read(PANEL_RING, low_hz), .013 * np.ones_like(low_hz), unlike=0.63)  # 13 ms

    t_ms = (np.arange(600) - LEAD) * 1000 / SR
    when, size = rng.random((len(ring_hz), 2, len(t_ms))).transpose(1, 0, 2)
    fade = to_linear_factor(-60 * np.maximum(t_ms, -1.7 * t_ms) / run_t60_ms[:, None])
    run = (when < .15) * 2 * (size - .5) * fade
    run *= np.where(t_ms < 0, 0.5, 0.6)  # faint cracks before and after
    run[:, LEAD] = 1  # the main crack

    def peaked(part):
        part = signal.fftconvolve(part, run[None], axes=2)
        return part / abs(part).max(2, keepdims=True).mean(0)
    return peaked(treble), peaked(low)


def crackle():
    """Tiny creases in clumps, a few of them large; firmer handling packs them closer."""
    per_second, run_t60_ms, spread_db = 1600, 3, 2.5  # per_second is before busy and clump act
    s, db, length = np.transpose(SQUEEZES)
    t, kinds = np.arange(N) / SR, 40
    # The grip builds up in 0.95 of a length and falls 16 dB over one length.
    level_db = np.interp(t, t[::64], swells(t[::64], s, db, 0.95 * length, length, 16))
    # A firmer grip leaves the body a smaller share.
    body_db = np.interp(t, *np.transpose(OPENING)) - 0.122 * (np.maximum(level_db, -60) + 40)
    busy = to_linear_factor(0.97 * (level_db + 36.0))
    clump = to_linear_factor(8.8 * evened(uniform_filter1d(rng.standard_normal(N), 400)))
    size = to_linear_factor(spread_db * np.minimum(rng.exponential(1, N), 3.4)) / np.sqrt(busy)
    size *= rng.random(N) < per_second * busy * clump / SR

    kind = rng.integers(0, kinds, N)
    ring_hz = rng.uniform(7000, 15500, kinds)
    shapes = np.vstack(buckles(ring_hz, run_t60_ms * np.ones(kinds)))[..., :600]
    grains = np.zeros((4, N + shapes.shape[2]))  # treble left and right, low left and right
    for at in np.flatnonzero(size):
        grains[:, at:at + shapes.shape[2]] += size[at] * shapes[:, kind[at]]
    mixed = evened(grains[:2, :N]) + to_linear_factor(body_db) * evened(grains[2:, :N])
    return mixed * to_linear_factor(level_db)


def snaps():
    """The creases that stand out, each with its own colour; more low body means a longer run."""
    s, db, hz, body_db = np.transpose(SNAPS)
    longer_db = 0.13 * (body_db + 45) + 2.2 * rng.standard_normal(len(s))
    treble, low = buckles(hz, 9 * to_linear_factor(longer_db))  # 9 ms, stretched or shortened
    sounds = (treble + to_linear_factor(body_db)[:, None] * low) * to_linear_factor(db)[:, None]
    out = np.zeros((2, N))
    starts = np.round(s * SR).astype(int) - LEAD
    for at, sound in zip(starts, sounds.transpose(1, 0, 2)):
        out[:, at:at + sound.shape[1]] += sound
    return out


def puffs():
    """Each puff is a soft, dying low push of pressure with a little turbulence, mostly at the right port."""
    rise_s, left_db = 0.0079, -29  # left level is relative to the right
    t, out = np.arange(3000) / SR, np.zeros((2, N))
    for s, db in PUFFS:
        hz = rng.uniform(49, 99)
        rough = evened(uniform_filter1d(uniform_filter1d(rng.standard_normal(len(t)), 130), 100))
        envelope = t / rise_s * np.exp(1 - t / rise_s)
        push = (np.sin(2 * np.pi * hz * t) + 0.47 * rough) * envelope
        out[:, round(s * SR):][:, :len(t)] += to_linear_factor(db + np.array([[left_db], [0]])) * push
    return out


def engine_note():
    """A distant engine as one sine gliding in pitch and level, alike at both ports."""
    t = np.arange(N) / SR
    s, hz, db = np.transpose(ENGINE)
    phase = 2 * np.pi * np.cumsum(np.interp(t, s, hz)) / SR
    return np.sqrt(2) * to_linear_factor(np.interp(t, s, db, left=-120)) * np.sin(phase)


def knocks():
    """Each tug rings a few low, damped modes whose pitches scatter from knock to knock."""
    t, out = np.arange(1500) / SR, np.zeros((2, N))
    for s, db in KNOCKS:
        ring = np.zeros(len(t))
        for hz, level, t60 in KNOCK_MODES:
            pitch = hz * rng.uniform(0.63, 1.48)
            ring += to_linear_factor(level - 60 * t / t60) * np.sin(2 * np.pi * pitch * t)
        out[:, round(s * SR):][:, :len(t)] += to_linear_factor(db) * ring / abs(ring).max()
    return out


def paths():
    """Near echoes, then a sparse tail that dies sooner in the treble; other taps for each port."""
    tail_db = -13
    taps = np.zeros((2, SR // 2))
    at = np.arange(300, SR // 2 - 20, 20) + rng.integers(0, 20, (2, (SR // 2 - 301) // 20))
    np.put_along_axis(taps, at, rng.choice([-1., 1.], at.shape), 1)
    hz, t, z = signal.stft(taps, SR, nperseg=256)
    fade = to_linear_factor(-60 * t / read(ROOM_T60, hz)[:, None])
    tail = signal.istft(z * fade, SR, nperseg=256)[1]
    tail *= to_linear_factor(tail_db) / np.linalg.norm(tail[0])
    for ms, db in ECHOES:
        delay = round(ms * rng.uniform(.93, 1.07) * SR / 1000)
        tail[[0, 1], delay + np.array([2 * LEFT_LAG, 0])] += to_linear_factor(db)
    return tail


def space(x):
    """Direct sound, and three sets of paths taking turns as the hands move."""
    turn = np.pi * 3.1 * np.arange(N) / SR
    out = np.array([np.roll(x[0], LEFT_LAG), x[1]])
    for k in range(3):
        share = np.sqrt(2 / 3) * np.cos(turn + k * np.pi / 3)
        out += signal.oaconvolve(x * share, paths(), axes=1)[:, :N]
    return out


def scene():
    """Wrapper in the room, over draught, puffs, hush, hum and engine."""
    air = draught() + hush() + motor_hum()
    wrapper = crackle() + snaps() + knocks()
    wrapper *= sides(-4.5)[:, None]  # left over right in dB: the wrapper is nearer the right port
    return space(wrapper) + air + puffs() + engine_note()


def top_cut(x):
    """Nothing passes above the cut-off."""
    return signal.sosfilt(signal.butter(12, 17010, fs=SR, output="sos"), x)


def record(dry):
    """The upper edge of the sound, as a filter on the finished mix."""
    hz, db = np.transpose(TOP_EDGE)
    edge_filter = signal.firwin2(511, hz, to_linear_factor(db), fs=SR)
    heard = signal.oaconvolve(dry, edge_filter[None], "same", axes=1)
    return top_cut(heard)


dry = scene()
out = record(dry)
store_pcm(out)
```